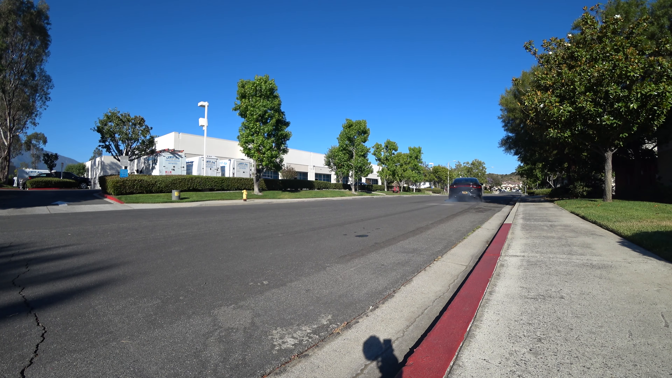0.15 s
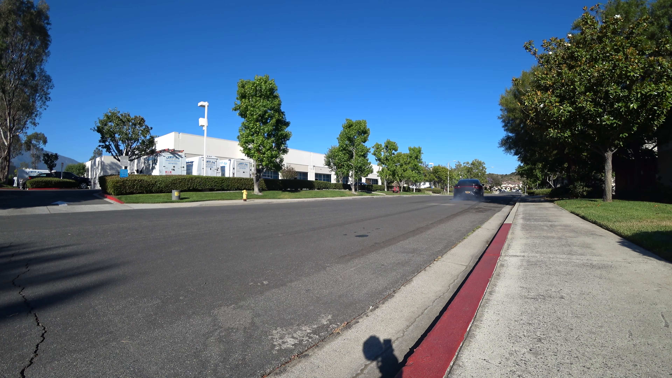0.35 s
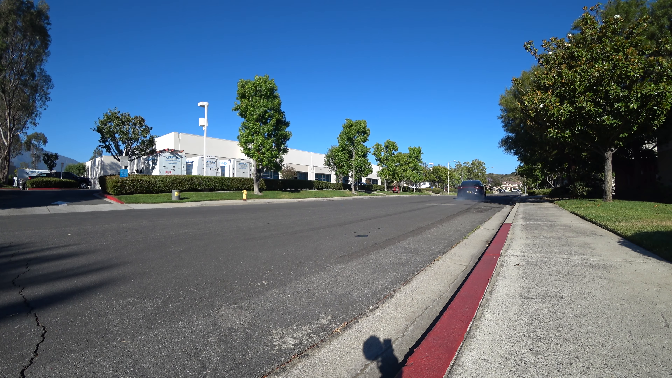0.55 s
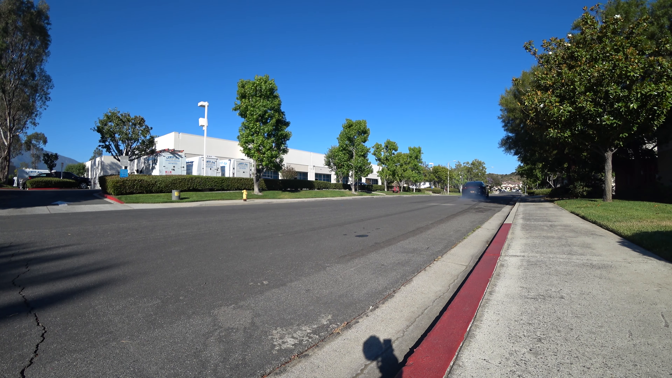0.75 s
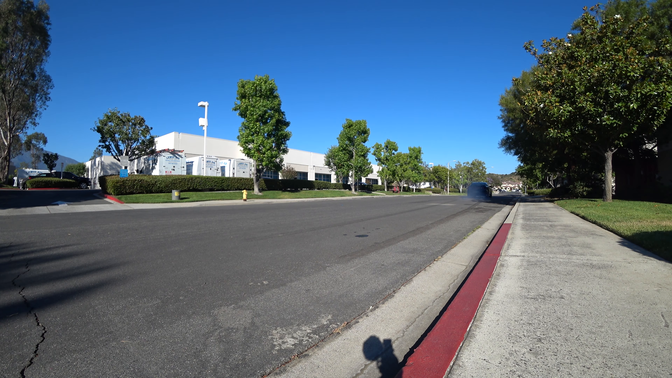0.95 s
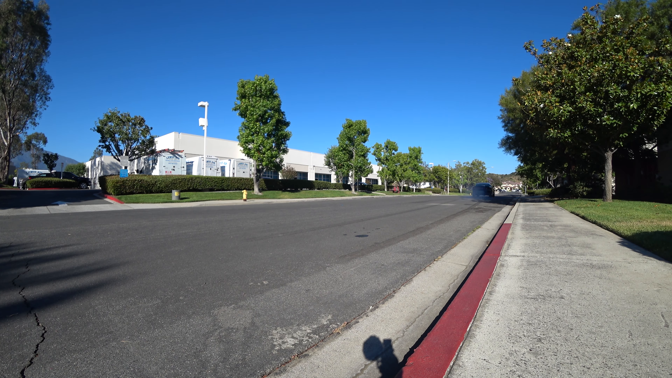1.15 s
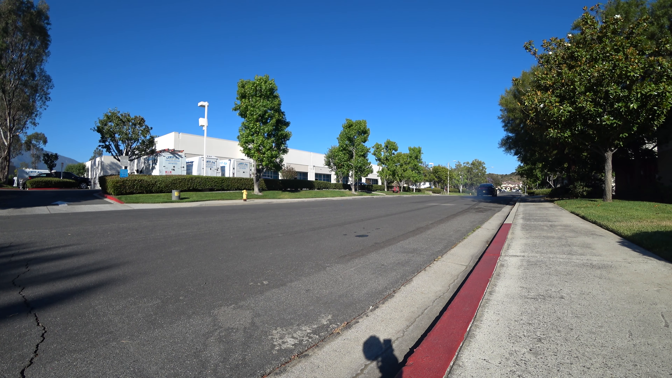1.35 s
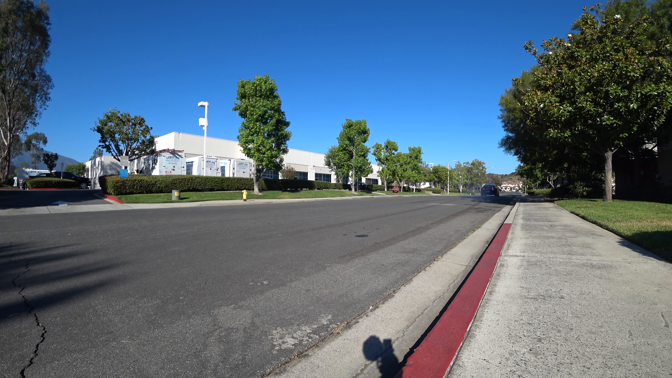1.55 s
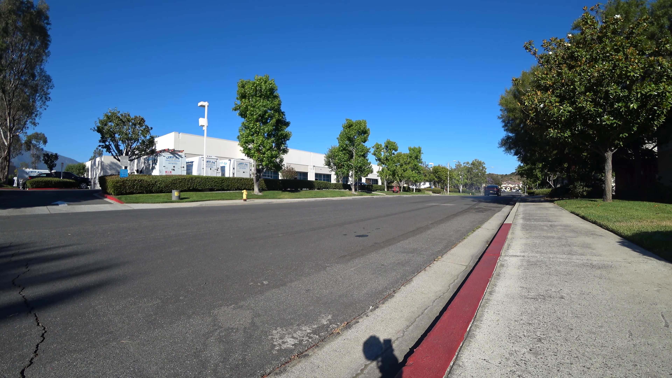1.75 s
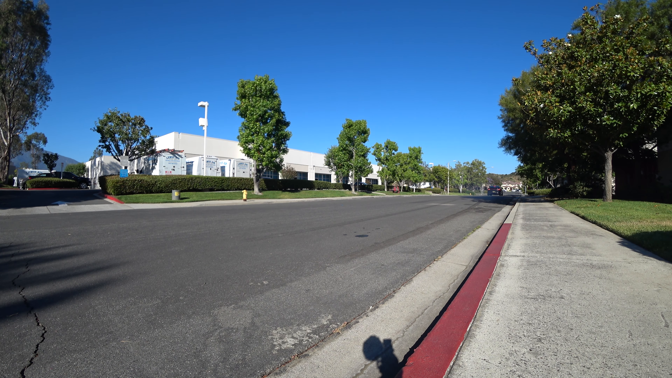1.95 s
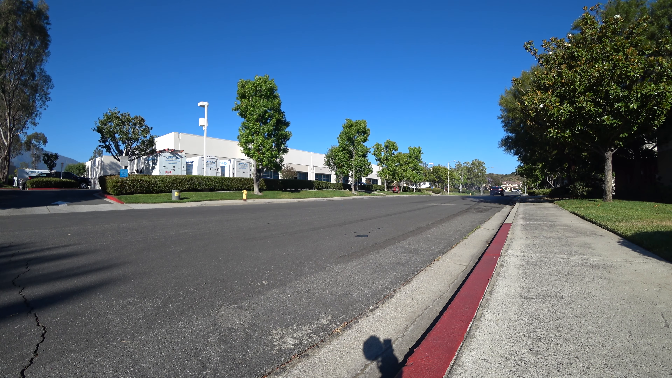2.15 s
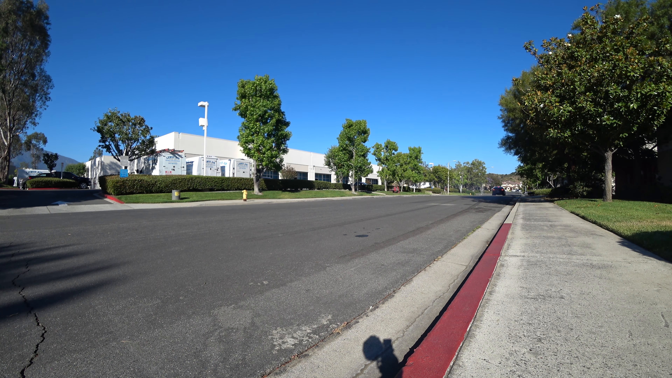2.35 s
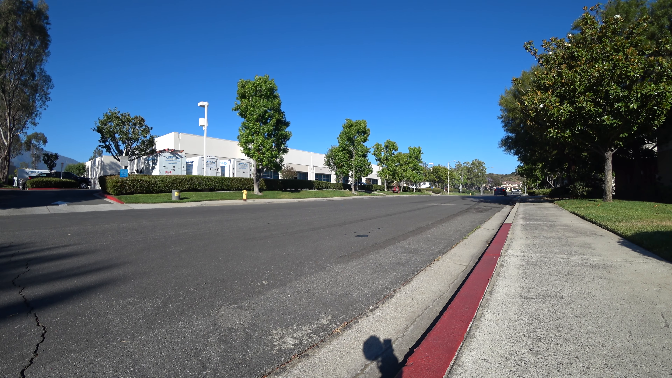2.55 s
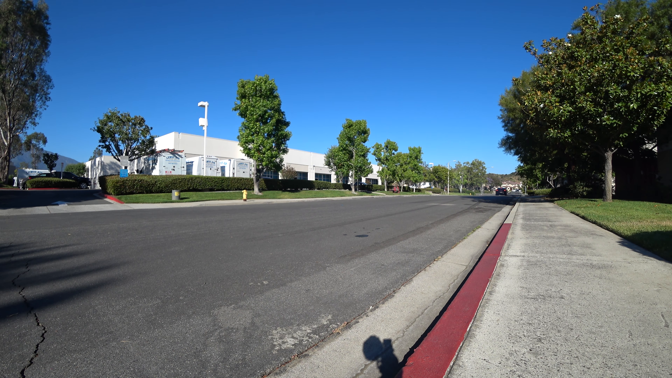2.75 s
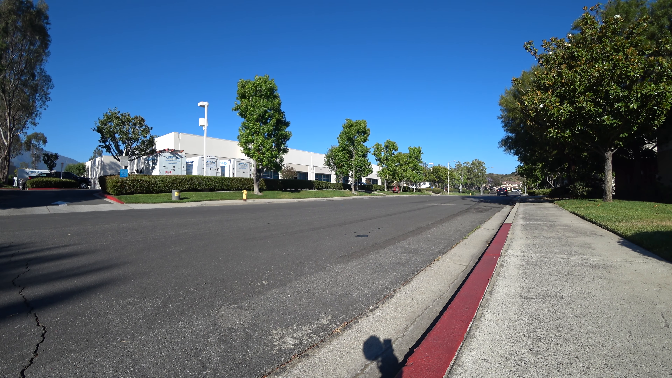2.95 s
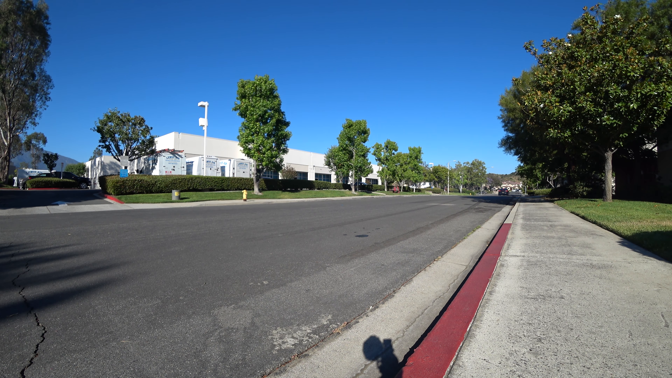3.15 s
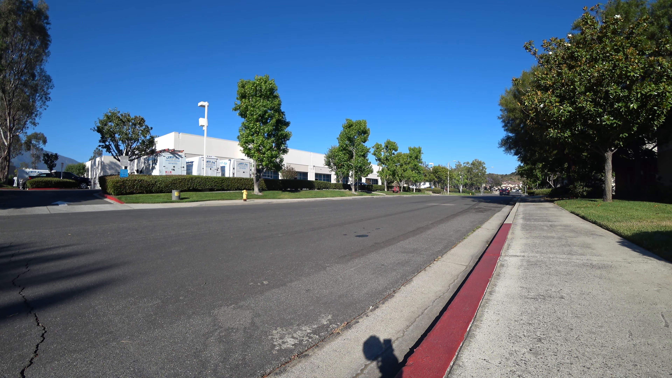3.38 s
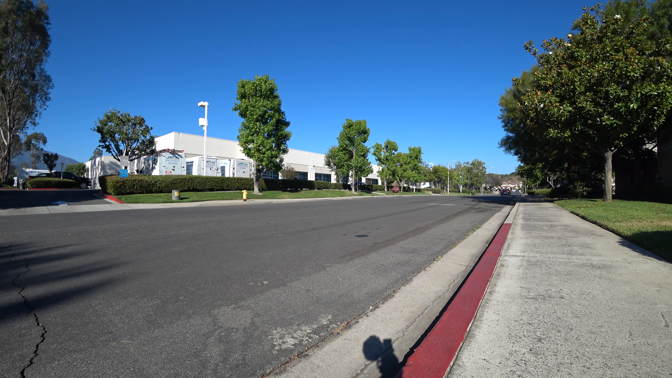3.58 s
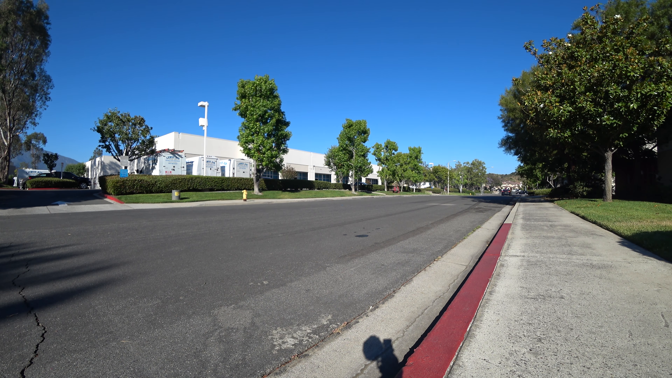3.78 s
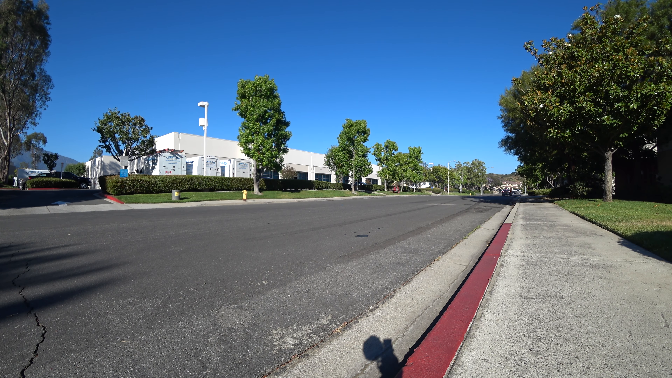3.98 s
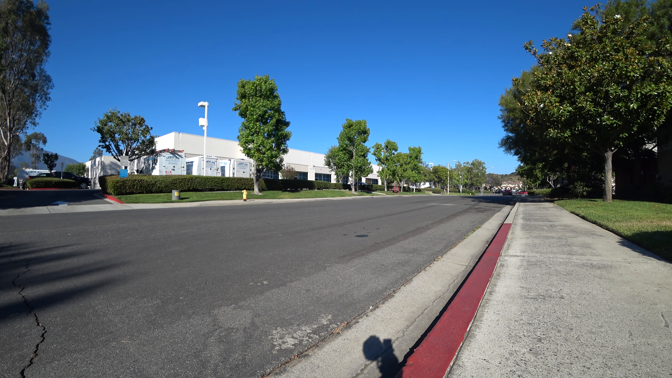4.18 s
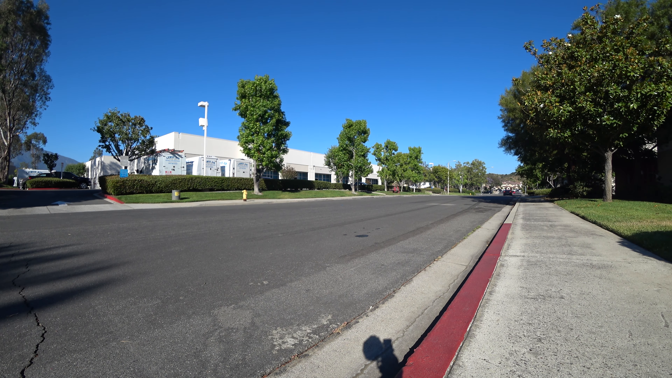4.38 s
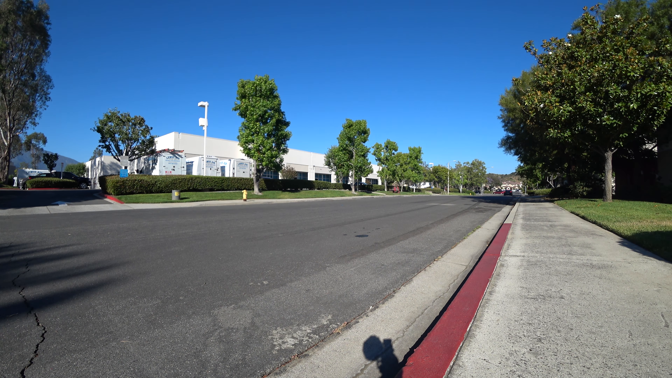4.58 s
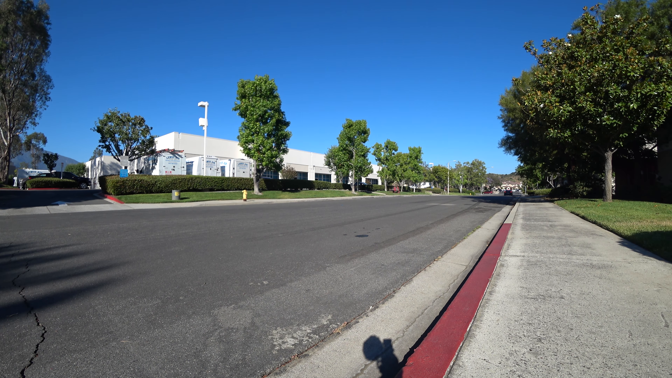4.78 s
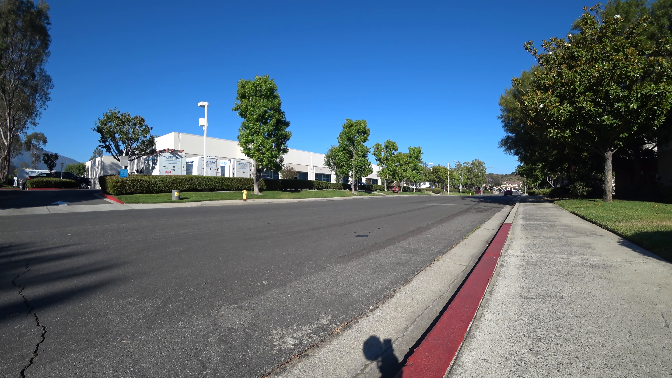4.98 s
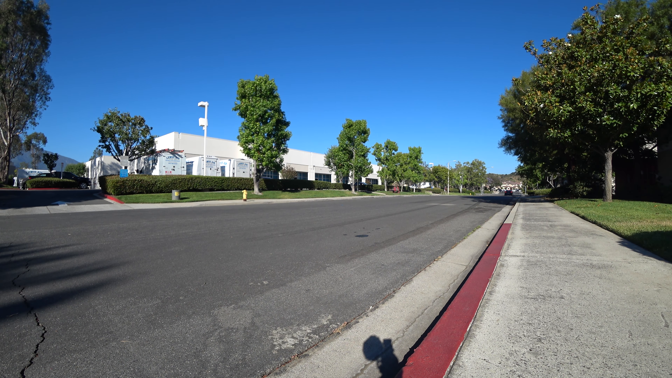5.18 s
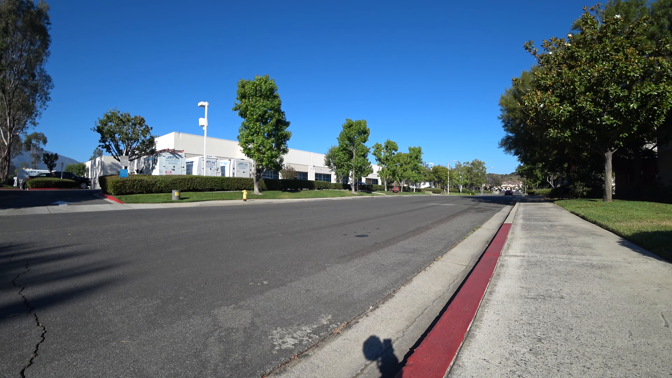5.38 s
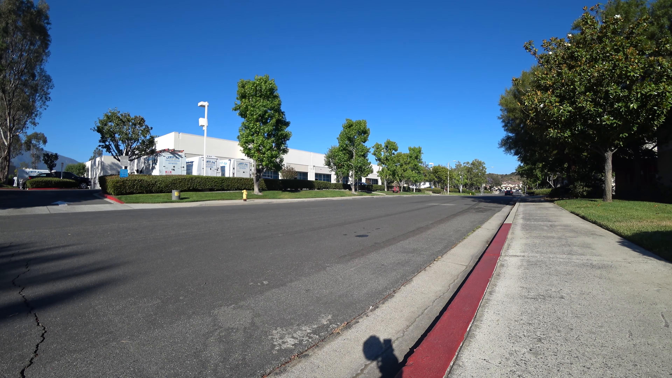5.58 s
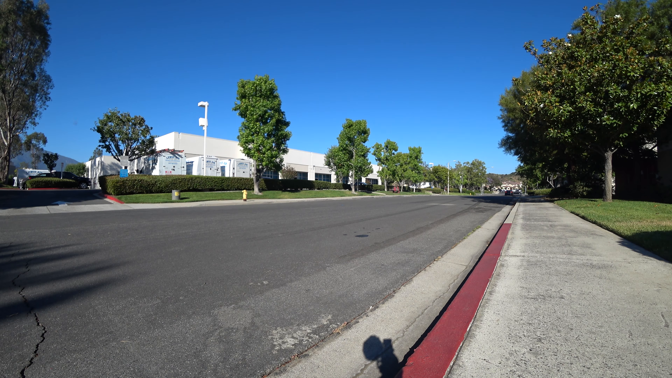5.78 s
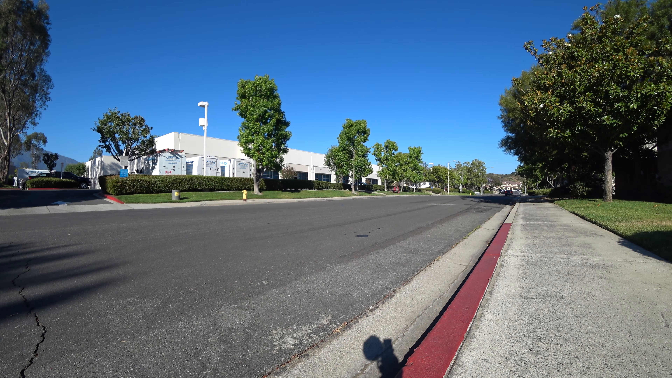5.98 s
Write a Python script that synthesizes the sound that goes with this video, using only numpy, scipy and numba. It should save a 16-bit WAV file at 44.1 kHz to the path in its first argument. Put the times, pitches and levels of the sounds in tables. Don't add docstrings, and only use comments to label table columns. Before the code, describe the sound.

A V8 car screams at full revs, lifts off in a volley of loud exhaust pops and tyre chirps, then pulls away burbling down a paved road.

```python
import sys
import numpy as np
from scipy import signal
from scipy.fft import rfft, irfft, next_fast_len
from scipy.io import wavfile
from scipy.ndimage import uniform_filter1d, map_coordinates
from numba import njit

SR = 44100
rng = np.random.default_rng(int(sys.argv[2]) if len(sys.argv) > 2 else 0)


def master(y):
    cut = np.clip(np.atleast_2d(y).T, -1, 1)
    pcm = np.round(cut * 32767)
    wavfile.write(sys.argv[1], SR, pcm.astype(np.int16))


def level_to_linear(level):
    exponent = np.asarray(level, float) / 20
    return 10 ** exponent


N = 265923

# t/s, level/dB
GAIN_T_DB = [
    (0, -71.5),
    (.8, -72),
    (1.8, -69.5),
    (2.2, -68.5),
    (3, -69.5),
    (3.8, -70),
    (4.3, -65),
    (5, -63.5),
    (6.03, -61),
]
# f/Hz, level/dB
HISS_HZ_DB = [(3000, -25), (5000, -11), (7000, -10.5), (9000, -1.5), (11000, -1.5), (15600, -3.5),
              (15800, -83.5)]
# f/Hz, level/dB
WHINE_HZ_DB = [(14800, -19), (8900, -21)]
# t/s, peak level/dB
TICKS_T_DB = [(.2003, -33), (.3218, -31), (.4012, -34), (.4445, -35), (.4625, -31), (.848, -40),
              (.8865, -50), (.8965, -47), (.9852, -37)]
# f/Hz, level/dB
TICK_HZ_DB = [(500, -36), (4000, -12), (15000, 0)]
# t/s, level/dB
INSECTS_T_DB = [
    (0, -92),
    (4.9, -98),
    (5.15, -65),
    (6.03, -73),
]
# f/Hz, level/dB
INSECT_HZ_DB = [(5600, -53.5), (6200, -7), (6900, 1), (7500, -46)]
# f/Hz, level/dB
WIND_HZ_DB = [(12, -56), (20, -28), (54, 5.5), (76, 5.5), (103, -9.5), (130, 12.5), (170, -50), (290, -120)]
# t/s, rise/dB, half length/s
GUSTS_T_DB_S = [(.4, 18, 0.11), (.63, 13, 0.072), (.85, 6, .04), (1.7, 0.5, 0.21), (2.43, 8, 0.046),
                (2.75, 10, 0.11), (3.3, 7, 0.084), (4.2, 6.5, 0.094), (4.46, 6.5, .05), (4.7, 7, 0.32)]
# f/Hz, level/dB
ROAR_HZ_DB = [(60, -20.5), (150, 7.5), (400, -7.5), (800, -2), (1100, -3.5), (1700, -13), (2500, -24),
              (5000, -42.5), (9000, -77.5)]
# t/s, rise/dB, half length/s
TRAFFIC_T_DB_S = [
    (2.2, 2, .25),
    (4.95, 1.5, 0.45),
]
# t/s, change/dB, half length/s
DUCKS_T_DB_S = [
    (0.78, -3.5, .05),
    (2.83, -5.5, 0.045),
    (3.68, -2, 0.33),
    (2.38, 2, .2),
]
# f/Hz, t60/s
STREET_HZ_T60 = [(100, 1), (1000, 0.27), (8000, 0.048)]

# t/s, f/Hz, level/dB
SQUEAL_T_HZ_DB = [(0.0, 1586, -14.5), (0.108, 1552, -16.5), (0.154, 1543, -47), (0.286, 1579, -42),
                  (0.47, 1500, -18), (0.478, 1520, -22), (0.558, 1578, -13.5), (0.704, 1520, -44),
                  (0.72, 1530, -46)]
# t/s, f/Hz, level/dB, half length/s
CHIRPS_T_HZ_DB_S = [(0.004, 1650, -20.5, 0.0049), (0.03, 1580, -22.5, 0.0061), (0.038, 3280, -25, 0.0055),
                    (.058, 2900, -15.5, 0.0028), (.061, 1450, -20, 0.011), (0.098, 1560, -24, 0.0032),
                    (0.119, 1560, -16, 0.0041), (0.15, 1450, -32, 0.0044), (0.351, 1600, -18.5, 0.006),
                    (0.378, 1480, -17, .006), (0.39, 1680, -15, 0.0029), (0.417, 1450, -16, 0.0082),
                    (0.46, 1510, -12, 0.0056), (0.517, 1600, -27, 0.0066), (0.52, 1650, -29, 0.0075),
                    (0.55, 1500, -15, 0.0059), (0.563, 1730, -15.5, 0.0048), (0.591, 1600, -21.5, 0.0052),
                    (0.618, 1550, -23, 0.0062)]

# t/s, firing rate/Hz
REVS_T_HZ = [(0, 397), (.187, 404), (.28, 333), (.44, 230), (.56, 184), (.7, 155), (.755, 149.4),
             (.88, 161.2), (1, 162), (1.52, 182.6), (1.9, 184.7), (2.05, 190), (2.2, 191.7), (2.35, 183.2),
             (2.65, 173), (3.85, 120.3), (4.1, 107), (6.03, 100)]
CYLINDERS_DB = [3, -0.5, -9, -7, -3.5, -21, -8, -8]
FRONTS_DB = [0, -2, -4, -10, -16, -24, -28, -30]
# t/s, pipe bark/dB, crack/dB
LIFT = [
    (.185, -40, -40),
    (.2, -26, -30),
    (.47, -25, -29),
]
EXHAUST_T_DB = LIFT + [(.54, -16, -22), (.66, -19, -16), (.81, -20, -25), (.86, -15.5, -16.5),
                (.96, -19, -21), (1.35, -14.5, -14), (1.7, -15, -15), (1.85, -15, -22), (2.3, -12, -24),
                (2.5, -9.5, -28.5), (3, -14, -27.5), (3.96, -18.5, -32), (4.13, -19.5, -47),
                (4.85, -23.5, -46), (5.3, -35.5, -48)]
# t/s, note/Hz, echo kept per trip/0-1, scatter of firing sizes/0-1
PIPE_T_HZ = [(0, 133, .2, .1), (.18, 133, .2, .1), (.22, 138, .3, .5), (.5, 134, .4, .4), (.7, 131, .6, .1),
             (1.2, 132, .65, .08), (1.6, 136, .65, .1), (2.1, 131, .74, .15), (2.5, 126, .77, .22),
             (3, 122, .77, .3), (3.8, 120, .76, .35), (4.3, 122, .78, .6), (6.03, 123, .7, .9)]
# f/Hz, level/dB
MUFFLER_HZ_DB = [(40, -63), (90, -5.5), (135, -1.5), (200, -1.5), (260, 6.5), (320, 3), (400, 0), (470, -4),
                 (600, -25.5), (1500, -120)]
# f/Hz, level/dB
TAILPIPE_HZ_DB = [(150, -40), (400, -10), (525, 0), (575, -3), (660, -19), (950, -19), (1300, -27),
                  (2500, -55), (6000, -120)]
# f/Hz, level/dB
FIRST_WAVE_HZ_DB = [(60, -30), (250, -3), (450, 0), (800, -6), (1300, -16), (2500, -45), (6000, -110)]
# t/s, rise/dB, half length/s
SURGE_T_DB_S = [
    (2.77, 13.5, 0.027),
]
# t/s, load/0-1
LOAD_T = [(.78, .1), (.86, .4), (1.75, .4), (2.4, .12)]

# t/s, peak level/dB
POPS_T_DB = [(.205, -2), (.226, 0), (.2482, -.5), (.2715, -1), (.2959, -1.5), (.3213, -.5), (.3484, 0),
             (.4441, 0), (.5091, -4), (.5513, -8)]
# t/s, peak level/dB
STRAYS_T_DB = [(.3354, -7), (.3697, -1), (.3846, -1), (.4007, -2), (.417, -4), (.4629, -2), (.4884, -6),
               (.5732, -9), (.5959, -7), (.6185, -11), (.642, -6)]
# f/Hz, level/dB
POP_HZ_DB = [(40, -42), (130, -11), (350, 0), (700, -3), (1200, -13), (3000, -36), (8000, -57),
             (16000, -78)]
# t/s, peak level/dB
BURBLES_T_DB = [(2.403, -18.5), (2.538, -6), (2.582, -8), (2.696, 5), (2.764, 0), (2.776, 1), (2.792, -6),
                (2.808, -5), (2.945, -13.5), (3.6, -14), (3.668, 2.5), (3.857, -13), (3.922, -2),
                (3.993, -15.5)]
# f/Hz, level/dB
BURBLE_HZ_DB = [(40, -30), (130, -8), (255, 0), (370, -9), (490, -7), (700, -26), (1500, -70), (3000, -120)]

# t/s, level/dB
BLAST_T_DB = [
    (0, -4.5),
    (.12, -2.5),
    (.185, -5.5),
    (.21, -0.5),
    (.35, -1),
    (.5, -2.5),
    (.67, -13.5),
    (.76, -36),
    (1, -64.5),
]
# f/Hz, level/dB
RASP_HZ_DB = [(900, -27), (1500, 4), (2100, -6), (3400, -8), (4500, -14.5), (6000, -19), (8700, -25.5),
              (10500, -36), (15700, -56)]
# f/Hz, level/dB
TOP_OCTAVE_HZ_DB = [(5000, -37.5), (8000, 1), (10000, -7), (15700, -19.5)]

# firing rate/Hz, level/dB
BOOM_HZ_DB = [(104, -42), (112, -24), (127, -12.5), (150, -12), (170, -17), (190, -20), (330, -20),
              (400, -42)]
# t/s, change/dB, half length/s
NULLS_T_DB_S = [(.49, -9, 0.087), (.61, -3.5, .06), (1.8, -7, 0.22), (2.76, -14, 0.28), (3.28, -4, .025),
                (3.46, -9, 0.052), (3.645, -10, 0.028), (3.86, -6.5, .035)]
# t/s, level/dB
OCTAVE_T_DB = [(.19, -30), (.3, -46), (.63, -34), (.7, -19), (1.4, -29), (2.4, -24), (2.7, -45),
               (3.96, -39.5), (4.2, -60)]
# t/s, level/dB
HALF_T_DB = [
    (.19, -61),
    (.25, -36),
    (.36, -25),
    (.44, -21),
    (.49, -50),
    (.6, -98.5),
]
# multiple of the cycle rate, level/dB
SCREAM_DB = [(1, -39), (2, -18), (3, -15), (4, -21), (5, -21), (6, -12), (7, -29), (8, 0), (9, -13),
             (10, -9), (11, -13), (12, -18), (13, -18), (14, -16), (15, -19), (16, -12), (17, -18),
             (18, -17), (19, -19), (20, -26), (21, -17), (22, -19), (23, -22), (24, -26)]
# t/s, share/0-1
FLAT_OUT_T = [(.187, 1), (.196, 0)]


def unit(x):
    return x / np.sqrt(np.mean(x ** 2) + 1e-20)


def along(points, hz):
    f, v = np.transpose(points)
    return np.interp(np.log(hz + 1), np.log(f + 1), v)


def curves(rows):
    s, *cols = np.transpose(rows)
    return [np.interp(np.arange(N) / SR, s, c) for c in cols]


def bumps(rows):
    return sum(db * np.exp(-((np.arange(N) / SR - s) / half_s) ** 2) for s, db, half_s in rows)


def wobble(rate_hz):
    knots = rng.standard_normal(int(N * rate_hz / SR) + 4)
    return map_coordinates(knots, [np.arange(N) * rate_hz / SR])


def coloured(x, spectrum):
    m = 2 * next_fast_len(N // 2 + 8192)
    gain = level_to_linear(along(spectrum, np.fft.rfftfreq(m, 1 / SR)))
    cep = irfft(np.log(gain + 1e-6), m)
    cep[1:m // 2] *= 2
    cep[m // 2 + 1:] = 0
    return irfft(rfft(x, m) * np.exp(rfft(cep)), m)[:N]


def rush(spectrum, patchy_db):
    z = signal.stft(rng.standard_normal(N), nperseg=512)[2]
    field = uniform_filter1d(rng.standard_normal(z.shape), size=5, axis=0)
    field = uniform_filter1d(field, size=12, axis=1)
    patchy = signal.istft(z * level_to_linear(patchy_db * unit(field)), nperseg=512)[1][:N]
    return unit(coloured(patchy, spectrum))


def steady(x):
    return x / np.sqrt(np.abs(uniform_filter1d(x ** 2, size=6000)) + 1e-9)


def spikes(rows, boost_db):
    s, db = np.transpose(rows)
    return np.bincount(np.round(s * SR).astype(int), level_to_linear(db + boost_db), N)[:N]


def gain_opened_db():
    gain_db, = curves(GAIN_T_DB)
    return gain_db - gain_db[0]


def wind():
    level_db = -39 + 0.96 * gain_opened_db() + bumps(GUSTS_T_DB_S)
    return level_to_linear(level_db) * unit(level_to_linear(0.5 * wobble(9.9)) * rush(WIND_HZ_DB, patchy_db=1.5))


def road_roar():
    far_db = -28 + 0.61 * gain_opened_db() + bumps(TRAFFIC_T_DB_S + DUCKS_T_DB_S)
    own_db = -21 + 0.55 * curves(BLAST_T_DB)[0]
    level = np.hypot(level_to_linear(far_db), level_to_linear(own_db))
    return level * level_to_linear(1.0 + 0.74 * wobble(6.3)) * rush(ROAR_HZ_DB, patchy_db=0.75)


def camera_hiss():
    t = np.arange(N) / SR
    whine = sum(level_to_linear(db) * (wobble(60) + .6) * np.sin(2 * np.pi * hz * t) for hz, db in WHINE_HZ_DB)
    whine *= level_to_linear(.6 * gain_opened_db() - 3)
    return level_to_linear(curves(GAIN_T_DB)[0]) * (rush(HISS_HZ_DB, patchy_db=0) + whine)


def insects():
    return level_to_linear(curves(INSECTS_T_DB)[0]) * rush(INSECT_HZ_DB, patchy_db=-3.5)


def bright_clicks():
    return coloured(spikes(TICKS_T_DB, boost_db=7), TICK_HZ_DB)


def street(x):
    hz, t, z = signal.stft(rng.standard_normal(SR // 2), SR, nperseg=256)
    decay = level_to_linear(-60 * t / along(STREET_HZ_T60, hz)[:, None])
    tail = signal.istft(z * decay, SR, nperseg=256)[1]
    delayed = np.pad(x, (700, 0))
    return signal.fftconvolve(delayed, tail / np.linalg.norm(tail))[:N]


def tyres():
    hz, db = curves(SQUEAL_T_HZ_DB + [(.76, 1520, -91.5)])
    sing = np.zeros(N)
    for shift in (.94, 1.05):
        phase = 2 * np.pi * np.cumsum(hz * (shift + .04 * wobble(60))) / SR
        sing += level_to_linear(3 * wobble(70)) * np.sin(phase)
    t = np.arange(SR) / SR
    chirps = np.zeros(SR)
    for s, f, level_db, half_s in CHIRPS_T_HZ_DB_S:
        chirps += level_to_linear(level_db) * np.exp(-((t - s) / half_s) ** 2) * np.sin(2 * np.pi * f * t)
    return level_to_linear(db - 6.5) * unit(sing) + np.pad(chirps, (0, N - SR))


@njit
def tube(x, trip, kept):
    y = x.copy()
    for i in range(len(x)):
        j = i - trip[i]
        k = int(j)
        if k >= 1:
            y[i] += kept[i] * (y[k] + (j - k) * (y[k + 1] - y[k]))
    return y


def pipe(x, share):
    note_hz, kept, _ = curves(PIPE_T_HZ)
    return tube(x, SR / note_hz, share * kept)


def crank():
    rate_hz, = curves(REVS_T_HZ)
    count = np.cumsum(rate_hz) / SR
    count += 8000 - count[round(1.2845 * SR)]
    return rate_hz, count


def firing_pulses(count):
    at = np.flatnonzero(np.diff(np.floor(count)) > 0)
    cylinder = np.round(count[at]).astype(int) % len(CYLINDERS_DB)
    chance = curves(PIPE_T_HZ)[2][at] * rng.standard_normal(N)[at]
    sizes = level_to_linear(CYLINDERS_DB)
    uneven, fronts = np.zeros((2, N))
    uneven[at] = np.mean(sizes) - sizes[cylinder] - chance
    fronts[at] = level_to_linear(FRONTS_DB)[cylinder] + chance
    return uneven, fronts


def gas_rasp(fronts):
    blast_db, = curves(BLAST_T_DB)
    puffs = uniform_filter1d(np.clip(fronts, 0, 1), size=40)
    puffs = signal.lfilter([1], [1, -.985], puffs)
    far_db = -39 - 1.54 * np.arange(N) / SR + bumps(DUCKS_T_DB_S)
    level = np.hypot(level_to_linear(-24 + blast_db), level_to_linear(far_db))
    rasp = level_to_linear(2.0) * level * steady(rush(RASP_HZ_DB, patchy_db=1.37) * (3.8 + steady(puffs)))
    near_db = -41.5 + 4.1 * blast_db
    return rasp + level_to_linear(near_db) * rush(TOP_OCTAVE_HZ_DB, patchy_db=-3)


def pop_events():
    main = POPS_T_DB + STRAYS_T_DB
    revs = np.transpose(REVS_T_HZ)
    leads = [(s - 2.15 / np.interp(s, *revs), db - 2.5) for s, db in POPS_T_DB]
    answers = [(s + .0057, db - 7) for s, db in main if not .36 < s < .45]
    return main + leads + answers


def pops():
    return coloured(pipe(-spikes(pop_events(), boost_db=33.5), .25), POP_HZ_DB)


def burbles():
    return coloured(pipe(-spikes(BURBLES_T_DB, boost_db=32.5), 0.93), BURBLE_HZ_DB)


def bark_and_crack(uneven, fronts):
    bark_db, crack_db = curves(EXHAUST_T_DB)
    bark = steady(coloured(pipe(uneven, 0.93), MUFFLER_HZ_DB))
    crack = steady(coloured(pipe(-fronts, .8), TAILPIPE_HZ_DB))
    crack += curves(LOAD_T)[0] * steady(coloured(-fronts * np.abs(fronts), FIRST_WAVE_HZ_DB))
    return level_to_linear(bark_db - 3.5) * bark + level_to_linear(crack_db + bumps(SURGE_T_DB_S) - 5.0) * crack


def firing_tone(rate_hz, count):
    note_hz = curves(PIPE_T_HZ)[0]
    meet_db = 18 * np.exp(-((rate_hz / note_hz - 1) / 0.07) ** 2)
    tone_db = along(BOOM_HZ_DB, rate_hz) + bumps(NULLS_T_DB_S)
    octave_db = curves(OCTAVE_T_DB)[0] + meet_db + 2.3 * wobble(5.2)
    tone = -level_to_linear(tone_db + 4.5) * np.cos(2 * np.pi * (count - .08))
    tone -= level_to_linear(octave_db + 4.5) * np.cos(4 * np.pi * (count - .12))
    depth = 2.2 * curves(LOAD_T)[0] * np.clip((rate_hz - 158) / 25, 0, 1)
    tone *= 1 + depth * np.cos(2 * np.pi * (count / len(CYLINDERS_DB) - .62))
    return tone + level_to_linear(curves(HALF_T_DB)[0] + 5.5) * np.sin(np.pi * count)


def scream(count):
    return sum(level_to_linear(db - 10.5 + wobble(20)) * np.sin(2 * np.pi * (k * count / 8 + rng.random()))
               for k, db in SCREAM_DB)


def engine():
    rate_hz, count = crank()
    uneven, fronts = firing_pulses(count)
    flat_out, = curves(FLAT_OUT_T)
    tones = flat_out * scream(count) + (1 - flat_out) * firing_tone(rate_hz, count)
    rough = bark_and_crack(uneven, fronts) + pops() + burbles() + gas_rasp(fronts)
    return tones, rough


def scene():
    air = wind() + road_roar() + camera_hiss() + insects() + bright_clicks()
    tones, rough = engine()
    rough = rough + tyres()
    return (air + level_to_linear(-16) * street(rough) + tones + rough)[None]


def low_pass(x):
    return signal.sosfilt(signal.butter(12, 15710, fs=SR, output="sos"), x)


def record(dry):
    capped = dry / (1 + np.abs(dry) ** 24) ** (1 / 24)
    limited = irfft(rfft(capped) * (np.fft.rfftfreq(N, 1 / SR) < 15720), N)
    return low_pass(limited)


dry = scene()
out = record(dry)
master(out)
```